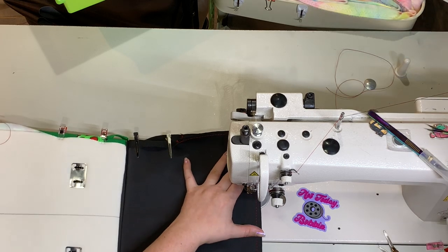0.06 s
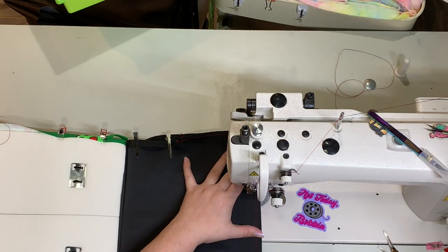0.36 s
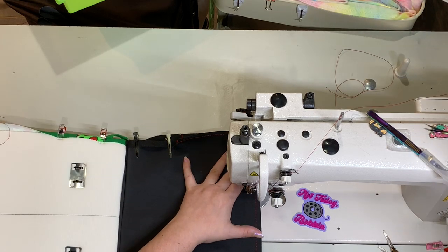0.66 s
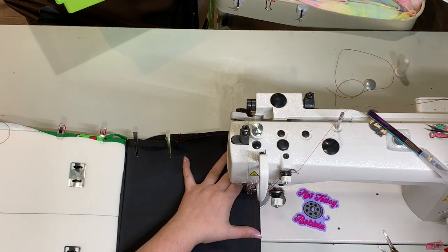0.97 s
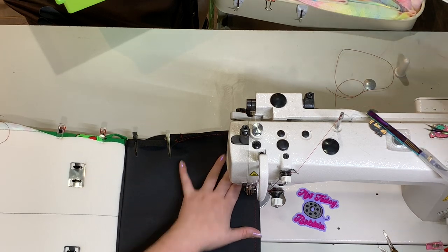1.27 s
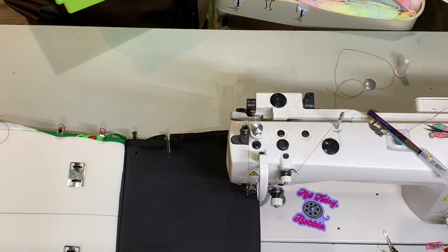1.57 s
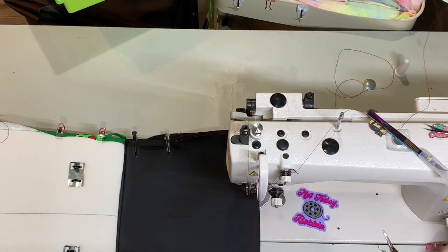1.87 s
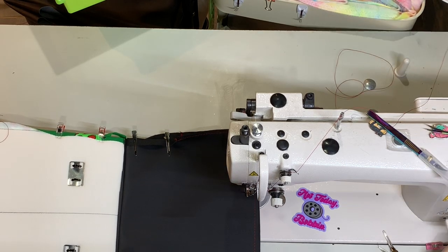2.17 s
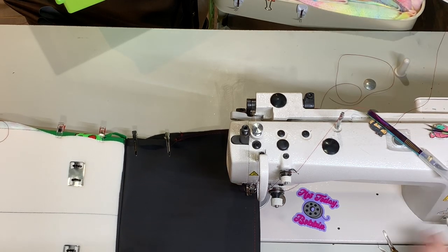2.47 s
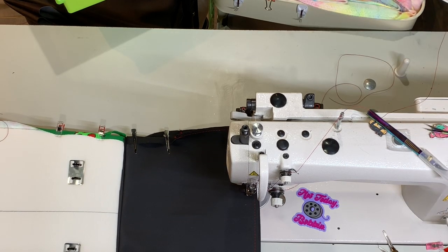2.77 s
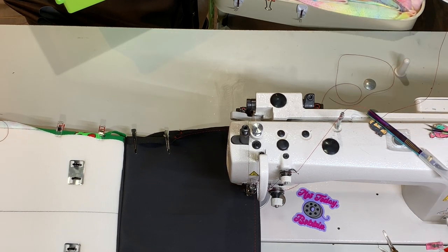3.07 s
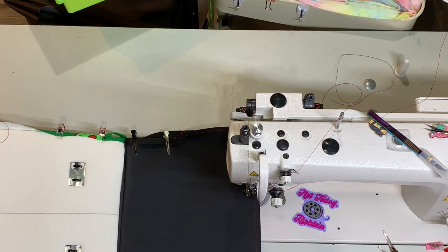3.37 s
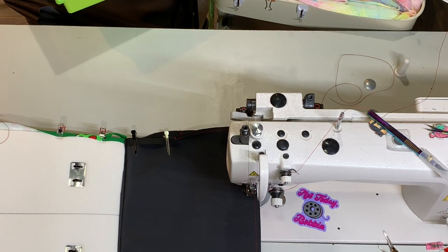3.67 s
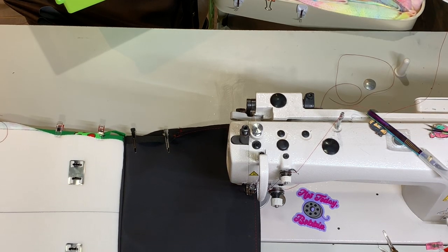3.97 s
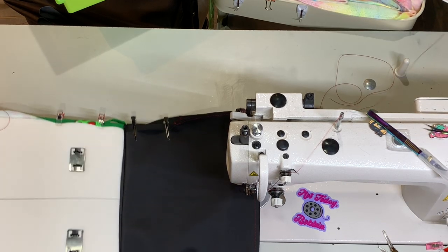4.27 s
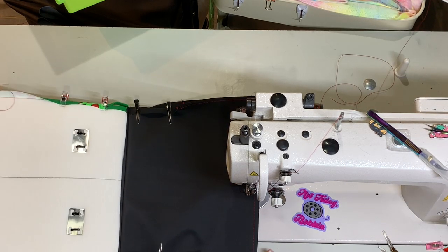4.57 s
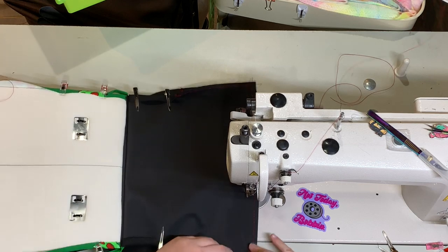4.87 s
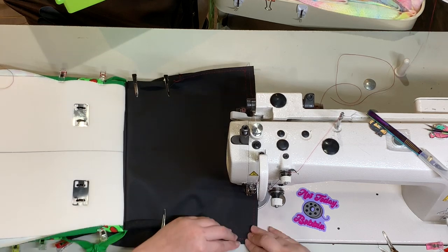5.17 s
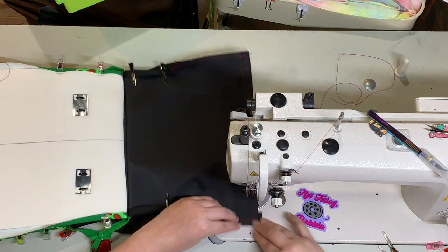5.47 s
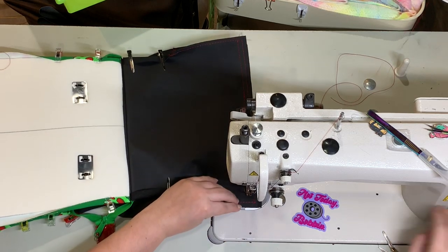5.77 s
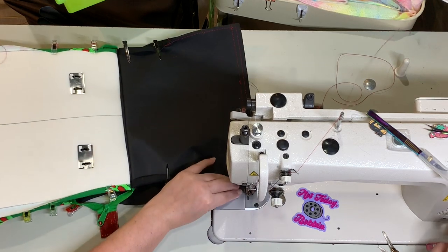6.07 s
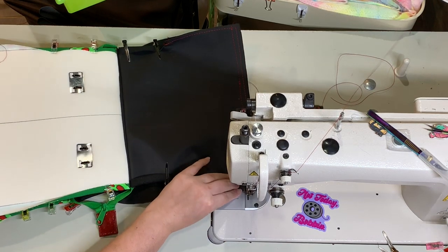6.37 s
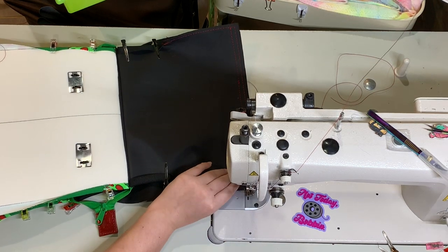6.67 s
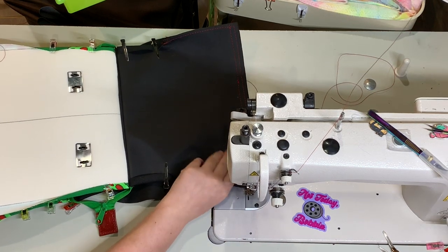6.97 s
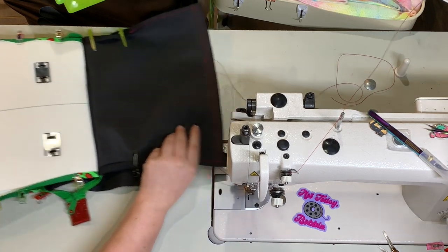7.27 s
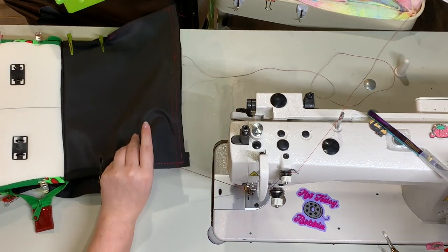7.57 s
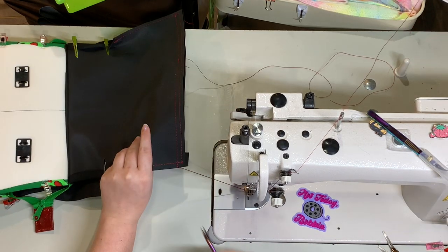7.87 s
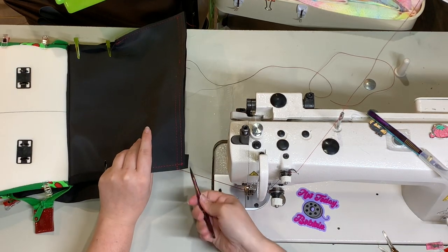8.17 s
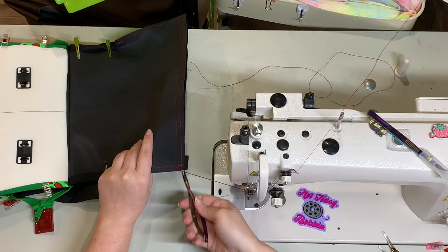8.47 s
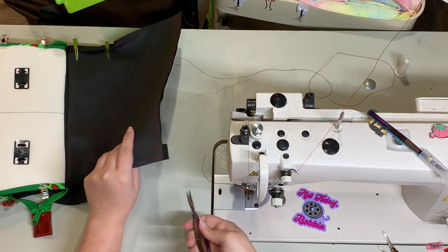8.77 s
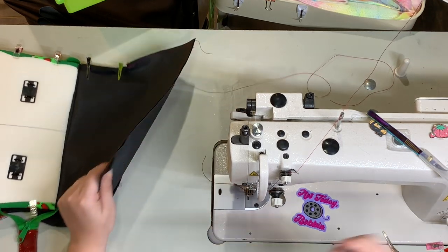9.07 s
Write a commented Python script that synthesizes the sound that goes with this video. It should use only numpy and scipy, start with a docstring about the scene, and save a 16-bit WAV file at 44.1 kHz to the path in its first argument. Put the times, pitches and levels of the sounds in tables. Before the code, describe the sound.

Heard from just above the table, light fabric rustles lead into a few slow stitches of an industrial sewing machine, with metallic clinks and knocks. After a short pause the machine speeds into a rapid two-second clatter with gear whine and a low table drone, then halts abruptly. Hands scuff and slide the cloth, and small thread snips click crisply. A low fan rumble fills the workroom throughout.

```python
"""A workroom with a low ventilation rumble, heard from above an industrial lockstitch machine on a table.
The machine makes a few slow stitches, then runs for two seconds at about 21 stitches a second and stops
sharply. Impacts of needle and linkages excite the modes of its head, the gears whine at multiples of the
shaft speed, and table and stand shake in forced vibration. Fingers scuff and slide the fabric, which
sounds by friction, and thread snips click."""
import sys
import numpy as np
from scipy import signal
from scipy.fft import rfft, irfft, next_fast_len
from scipy.io import wavfile
from scipy.ndimage import uniform_filter1d, map_coordinates

SR = 44100
rng = np.random.default_rng(int(sys.argv[2]) if len(sys.argv) > 2 else 0)


def put_to_file(sound):
    """Save the sound as 16-bit audio at rate SR, in the file named by the first command-line argument."""
    columns = np.atleast_2d(sound).T  # one column per channel
    safe = np.clip(columns, -1, 1)
    whole_steps = np.round(safe * 32767)
    wavfile.write(sys.argv[1], SR, whole_steps.astype(np.int16))


N = 411894

# Modes of the machine's head. Each row: frequency in Hz, relative level in dB, t60 in seconds.
HEAD_MODES = [(502, -13, 0.19), (1406, 3, 0.088), (1478, -14, 0.048), (1747, -23, 0.056),
              (1841, -4.5, 0.051), (2326, -6, 0.064), (2980, -4.5, 0.017), (3140, -16, 0.086),
              (3950, -14, 0.047), (4550, -16, 0.096), (6360, -10, 0.043), (8110, 2.5, 0.022)]
# Spectra of the machine's rattle as heard, with a narrow gap near 11.3 kHz, and of the ringing table.
# Each row: frequency in Hz, relative density in dB.
RATTLE_SPECTRUM = [(60, -15), (200, -6), (400, -6), (560, -4.5), (690, -7), (1150, -8.5), (1850, -9.5),
                   (2900, -9.5), (3500, -13), (4700, -12), (7000, -18), (8400, -15), (10200, -17.5),
                   (11300, -50), (13300, -10), (15000, -25), (16000, -42)]
DRONE_SPECTRUM = [(100, -21), (165, -13.5), (205, 9.5), (250, -7.5), (305, -6.5), (380, -13.5), (510, -8.5),
                  (750, -54)]
# Likeness of the two channels for rumbles and for near sources. Each row: frequency in Hz, coherence.
RUMBLE_COHERENCE = [(100, 0.92), (300, 0.88), (700, 0.065), (2000, 0.14), (8000, 0.11)]
NEAR_COHERENCE = [(150, 1), (500, 0.89), (1200, 0.61), (2500, 0.059), (5000, 0.037), (9000, 0.24),
                  (13500, 0.46)]


def amp(db):
    """Amplitude ratio of a level in decibels."""
    return 10 ** (np.asarray(db) / 20)


def unit(x):
    """Normalisation to an rms of 1."""
    return x / np.sqrt(np.mean(x ** 2) + 1e-20)


def along(points, hz):
    """Interpolation of (Hz, value) points on a logarithmic frequency axis."""
    freqs, values = np.transpose(points)
    return np.interp(np.log(hz + 1), np.log(freqs + 1), values)


def curve(points, outside):
    """Linear interpolation of (seconds, value) points at every sample."""
    return np.interp(np.arange(N) / SR, *np.transpose(points), outside, outside)


def wobble(rate):
    """Smooth random modulation: a spline through rate knots a second."""
    coarse = np.arange(0, N + 16, 16)
    knots = rng.standard_normal(int(N * rate / SR) + 4)
    return np.interp(np.arange(N), coarse, map_coordinates(knots, [coarse * rate / SR]))


def wander(rough, size):
    """Random walk in the phase of a ring whose contact chatters."""
    return rough * np.cumsum(rng.standard_normal(size)) / np.sqrt(SR)


def filtered(x, response):
    """Linear filtering: the spectrum of x times a frequency response."""
    n = x.shape[-1]
    padded = next_fast_len(n + 8192)
    return irfft(rfft(x, padded) * response(np.fft.rfftfreq(padded, 1 / SR)), padded)[..., :n]


def stereo(pair, spectrum, coherence):
    """Mid-side mixing turns two independent signals into a coloured, partly coherent pair of rms 1."""
    def response(hz):
        angle = np.arccos(np.clip(along(coherence, hz), -1, 1)) / 2
        return amp(along(spectrum, hz)) * [np.cos(angle), np.sin(angle)]
    mid, side = filtered(pair, response)
    return unit(np.array([mid + side, mid - side]))


def noise(spectrum, size, coherence=NEAR_COHERENCE):
    """Coloured Gaussian stereo noise of rms 1."""
    return stereo(rng.standard_normal((2, size)), spectrum, coherence)


def add(track, s, sound):
    """Superposition of a sound on the track, starting at s seconds."""
    part = track[:, max(0, round(s * SR)):][:, :sound.shape[1]]
    part += sound[:, :part.shape[1]]


def friction_gain(strokes, power):
    """Friction noise follows a power of the sliding speed, half a sine in each stroke."""
    t = np.arange(N) / SR
    return sum(amp(db) * np.abs(np.sin(np.pi * np.clip((t - s) / length, 0, 1))) ** power
               for s, length, db in strokes)


def ventilation(level_db, hum_db):
    """Fan noise: a low broadband rumble with faint discrete tones."""
    # Each row: frequency in Hz, relative density in dB.
    air_spectrum = [(13, -44), (22, -0.5), (54, -9.5), (81, 1.5), (108, -3.5), (197, -2.5), (257, -10),
                    (297, -10.5), (437, -19), (505, -19), (628, -26.5), (762, -25), (2250, -39),
                    (3310, -41.5), (7000, -58), (9100, -88), (15400, -120)]
    t = np.arange(N) / SR
    hum = sum(amp(2.7 * wobble(2.8)) * np.sin(2 * np.pi * hz * t + wobble(4.2))
              for hz in (37.7, 80.7, 150.7))
    rumble = amp(level_db + .7 * wobble(9)) * noise(air_spectrum, N, RUMBLE_COHERENCE)
    return rumble + amp(hum_db) * hum


def room(x):
    """Reverberation: wall reflections decay exponentially, each frequency at its own rate."""
    # Each row: frequency in Hz, t60 in seconds.
    decay_times = [(150, 0.29), (1500, 0.38), (6000, 0.39), (14000, 0.11)]
    hz, t, bands = signal.stft(rng.standard_normal((2, SR // 2)), SR, nperseg=256)
    tail = signal.istft(bands * amp(-60 * t / along(decay_times, hz)[:, None]), SR, nperseg=256)[1]
    tail = np.pad(tail / np.linalg.norm(tail[0]), ((0, 0), (SR // 200, 0)))
    high_passed = filtered(x, lambda f: f ** 2 / (f ** 2 + 400 ** 2))
    return signal.fftconvolve(high_passed, tail, axes=1)[:, :N]


def bumps(gain_db, t60):
    """Soft impacts of hand, fabric and needle bar on the table excite mainly low frequencies."""
    # Each row: start in seconds, relative level in dB.
    contacts = [(0.089, -35), (0.919, -42), (2.535, -21), (2.56, -26), (6.49, -30), (9.286, -30)]
    # Each row: frequency in Hz, relative density in dB.
    bump_spectrum = [(200, 0), (500, 4), (900, 6), (1600, -5), (4000, -37), (9000, -37)]
    out, t = np.zeros((2, N)), np.arange(SR // 5) / SR
    for s, db in contacts:
        add(out, s, noise(bump_spectrum, len(t)) * amp(db + gain_db - 60 * t / t60))
    return out


def fabric_scuffs(gain_db, slip_hz, slip_t60, attack_s, release_t60):
    """Stick-slip friction of the weave drives a resonance of the stiff fabric panel in short rasps."""
    # Each row: start in seconds, length in seconds, relative level in dB, resonance in Hz.
    rasps = [(1.063, 0.022, -50.5, 2000), (1.201, 0.037, -38.5, 1730), (1.242, 0.025, -39.5, 2080),
             (1.285, 0.023, -45, 1600), (1.4046, 0.026, -38, 1950), (1.461, 0.019, -41.5, 2400),
             (1.61, 0.018, -43, 2260), (6.812, 0.012, -38.5, 2900), (6.834, 0.03, -37.5, 1630),
             (6.922, 0.031, -38.5, 1650), (7.018, 0.019, -36, 1750), (7.088, .011, -36.5, 1750),
             (7.107, .011, -38, 1710), (7.138, 0.016, -35.5, 1630), (7.174, 0.013, -36.5, 1920),
             (7.248, 0.022, -42.5, 2190), (7.699, 0.033, -37.5, 1790), (7.811, 0.021, -41.5, 1680),
             (7.9748, 0.03, -36.5, 1710), (8.003, 0.024, -42.5, 1680), (8.185, .016, -47.5, 1610)]
    # Each row: frequency in Hz, relative density in dB.
    rasp_spectrum = [(400, -8.5), (900, -7.5), (1300, -0.5), (1750, -7), (2400, -3.5), (3200, -8),
                     (4300, -18), (9000, -41)]
    panel_db, half_width = 11, .06  # width as a share of the resonance frequency
    out, t = np.zeros((2, N)), np.arange(SR // 10) / SR
    for s, length, db, hz in rasps:
        slips = np.cumsum(np.r_[0, rng.uniform(.5, 1.5, size=64)]) / slip_hz
        since_slip = t - slips[np.searchsorted(slips, t, "right") - 1]
        grains = rng.standard_normal((2, len(t))) * amp(-60 * since_slip / slip_t60)
        panel = lambda f: np.sqrt(1 + amp(2 * panel_db) / (1 + ((f / hz - 1) / half_width) ** 2))
        rasp = unit(filtered(stereo(grains, rasp_spectrum, NEAR_COHERENCE), panel))
        envelope = (1 - np.exp(-t / attack_s)) * amp(-60 * np.maximum(t - length, 0) / release_t60)
        add(out, s, amp(db + gain_db) * envelope * rasp)
    return out


def fabric_slides(grain_db, rest_db):
    """Sliding friction between fabric and table gives a grainy hiss."""
    # Each row: start in seconds, length in seconds, level in dB.
    pushes = [(-.1, 0.26, -60), (.24, 0.21, -73.5), (.7, 0.19, -82), (1.24, 0.21, -54.5), (1.37, 0.22, -47),
              (1.59, 0.15, -51), (1.85, 0.13, -68), (1.98, 0.31, -59), (2.68, 0.2, -69), (2.9, .22, -64),
              (3.12, 0.2, -60.5), (3.47, 0.12, -67), (3.7, 0.21, -62), (6.52, 0.23, -54.5),
              (6.72, 0.59, -60), (7.08, 0.7, -53), (7.6, 0.2, -61), (8.92, 0.27, -55), (9.14, 0.32, -56.5)]
    # The hiss as heard, with a gap near 11.3 kHz. Each row: frequency in Hz, relative density in dB.
    hiss_spectrum = [(500, 6), (2000, 3.5), (4500, -0.5), (7000, -5.5), (9000, 3.5), (11300, -19.5),
                     (13800, 1), (15800, -17)]
    envelope = friction_gain(pushes, power=0.9) + amp(rest_db)
    return envelope * noise(hiss_spectrum, N) * amp(grain_db * wobble(500))


def snips(tick_db, tick_t60, shimmer_db, shimmer_t60, knock_db, knock_t60):
    """Hard impacts of blades, clips and levers reach high frequencies; some carry a duller knock."""
    # Each row: start in seconds, relative level in dB, relative level of the knock in dB.
    closings = [(1.984, -34.5, -5.5), (2.279, -33, -23), (2.443, -23, -22), (3.55, -43, -5.5),
                (3.706, -33, -12.5), (7.392, -30, -19), (7.522, -22, -37), (8.107, -45, 2),
                (8.2302, -21, -23), (8.6085, -44, 14), (8.6125, -46.5, 9), (8.9116, -22, -20),
                (9.092, -21.5, -34)]
    # The clicks as heard, with a gap near 11.5 kHz, and the knock.
    # Each row: frequency in Hz, relative density in dB.
    click_spectrum = [(1500, -31), (5000, -15.5), (7500, -14), (9500, 3.5), (11500, -19), (13000, 7.5),
                      (14800, -3), (16500, -23)]
    knock_spectrum = [(150, -31), (450, 1), (750, 4), (1500, -5), (2400, -3.5), (3700, -7), (4900, -11.5),
                      (15000, -24)]
    out, t = np.zeros((2, N)), np.arange(SR // 8) / SR
    for s, db, own_knock_db in closings:
        envelope = amp(tick_db - 60 * t / tick_t60) + amp(shimmer_db - 60 * t / shimmer_t60)
        tick = noise(click_spectrum, len(t)) * envelope
        knock = noise(knock_spectrum, len(t)) * amp(knock_db + own_knock_db - 60 * t / knock_t60)
        add(out, s, amp(db) * (tick + knock))
    return out


def squeak(rough):
    """Stick-slip oscillation of a dry joint makes a short, falling chirp."""
    # In order: start in seconds, length in seconds, level in dB, first and last pitch in Hz.
    chirp = (2.468, .042, -36, 3300, 3080)
    s, length, db, first_hz, last_hz = chirp
    hz = curve([(s, first_hz), (s + length, last_hz)], first_hz)
    phase = 2 * np.pi * np.cumsum(hz) / SR + rough * wobble(400)
    return friction_gain([(s, length, db)], power=0.71) * np.sin(phase)


def clinks(attack_s, rough):
    """Damped free vibration of loose steel parts, each at its own unsteady pitch."""
    # Each row: start in seconds, level in dB, frequency in Hz, t60 in seconds.
    loose_parts = [(2.257, -26.5, 2080, 0.028), (2.282, -31.5, 3030, 0.16), (2.412, -25, 2220, .04),
                   (2.428, -23.5, 1320, 0.03), (2.469, -36, 3150, 0.024), (2.535, -24, 1420, 0.055),
                   (2.646, -24.5, 2340, 0.035), (2.66, -21, 1480, 0.036), (6.398, -24, 1450, 0.045),
                   (6.411, -29, 1480, 0.07)]
    out, t = np.zeros((2, N)), np.arange(SR // 5) / SR
    for s, db, hz, t60 in loose_parts:
        drift = wander(rough, len(t)) + rng.normal(0, 0.44, (2, 1))
        envelope = amp(db - 60 * t / t60) * (1 - np.exp(-t / attack_s))
        add(out, s, envelope * np.sin(2 * np.pi * hz * t + drift))
    return out


def head_ring(t):
    """Modal response of the struck head: damped sines of random strength, with random phase offsets between
    left and right that grow with pitch."""
    ring = 0
    for hz, db, t60 in HEAD_MODES:
        envelope = amp(db + rng.normal(0, 3.0) - 60 * t / t60)
        drift = wander(10, len(t)) + rng.normal(0, 0.45, (2, 1)) * hz / 1500
        ring += envelope * np.sin(2 * np.pi * hz * t + drift)
    return ring


def through_head(x, peak_db, width=0.013):
    """Resonance lifts whatever sounds inside the head at the head's modes."""
    def response(f):
        peaks = sum(amp(2 * peak_db + db) / (1 + ((f - hz) / (width * hz)) ** 2)
                    for hz, db, _ in HEAD_MODES)
        return np.sqrt(1 + peaks)
    return filtered(x, response)


def clacks(ring_db, crack_db, crack_t60, buzz_db, buzz_t60):
    """Impact excitation: levers and needle bar hit their stops with a crack, and the head rings."""
    # Each row: start in seconds, relative level in dB, relative level of the ring in dB.
    impacts = [(2.083, -32.5, -10), (2.2222, -26, -19), (2.2584, -27, -24), (2.285, -20.5, -6),
               (2.3, -34, -11), (2.38, -32, -3), (2.413, -23.5, -13), (2.442, -24, -22), (2.4694, -18, -25),
               (2.534, -11.5, -13), (2.558, -20, -11), (2.623, -28, 0), (2.6477, -16.5, -19),
               (2.661, -29, -1), (2.795, -33.5, -40), (2.813, -34, -30), (3.91, -30.5, -34),
               (3.986, -24.5, -8.5), (4.022, -14.5, -3.5), (4.098, -21.5, -23), (4.119, -17.5, -24),
               (6.204, -20.5, -14), (6.234, -19, -16), (6.267, -10.5, -31), (6.29, -17.5, -10.5),
               (6.321, -39, -12), (6.361, -35, -3), (6.4, -31, -10), (6.585, -30.5, -22)]
    out, t = np.zeros((2, N)), np.arange(SR // 5) / SR
    for s, db, own_ring_db in impacts:
        envelope = amp(crack_db - 60 * t / crack_t60) + amp(buzz_db - 60 * t / buzz_t60)
        crack = through_head(noise(RATTLE_SPECTRUM, len(t)), peak_db=8.0) * envelope
        ring = amp(ring_db + own_ring_db) * head_ring(t) * (1 - np.exp(-t / 0.0026))
        add(out, s, amp(db) * (crack + ring))
    return out


def shaft(speed_rows, stitch_s):
    """Shaft speed and its integral, the angle in turns, which is zero at stitch_s."""
    speed = curve(speed_rows, 0)
    turns = np.cumsum(speed) / SR
    return speed, turns - np.interp(stitch_s * SR, np.arange(N), turns)


def rattle(turns, spread_db, hiss_db, smear_t60, locked_share, count=40):
    """Periodically modulated noise: small contacts recur each turn over the hiss of hook and thread."""
    # Load on the linkages. Each row: share of a turn, gain in dB.
    load_cycle = [(.02, -0.5), (.1, -1), (.2, -1), (.36, -0.5), (.6, -4.5), (.73, -1.5), (.88, -1.5)]
    places = (np.arange(count) + rng.random(count)) / count
    sizes_db = rng.uniform(-1.1, 1, count) * spread_db
    angles = np.arange(np.ceil(turns[0]) - 1, turns[-1])[:, None] + places
    samples = np.interp(angles, turns, np.arange(N)).astype(int)
    in_run = (angles > turns[0]) & (angles < turns[-1])
    energies = amp(sizes_db + rng.normal(0, 5.6, angles.shape)) ** 2 * in_run
    impulses = np.bincount(samples.ravel(), energies.ravel(), N)
    # the covers smear the energy of every contact over a few milliseconds
    t = np.arange(SR // 25) / SR
    power = abs(signal.fftconvolve(impulses, amp(-60 * t / smear_t60) ** 2)[:N])
    step = np.gradient(turns)
    power /= power[step > 0].mean()
    envelope = np.sqrt((power + amp(hiss_db) ** 2) / (1 + amp(hiss_db) ** 2))
    # part of the friction repeats with the surface of the gears, turn after turn
    surface = rng.standard_normal((2, 2048))
    locked = surface[:, (turns % 1 * 2048).astype(int) % 2048] * (step > 0)
    share = locked_share * step / step.max()
    friction = np.sqrt(share) * locked + np.sqrt(1 - share) * rng.standard_normal((2, N))
    load = amp(np.interp(turns, *np.transpose(load_cycle), period=1))
    return stereo(friction, RATTLE_SPECTRUM, NEAR_COHERENCE) * envelope * load


def slow_stitches(rub_db, drone_db):
    """At a crawl, friction in the linkages sounds in strokes and the table drones with the speed."""
    # Each row: time in seconds, shaft speed in turns a second.
    crawl_speed = [(2.1, 3), (2.3, 6.4), (2.45, 8.5), (2.65, 8.5), (2.8, 2.4)]
    # Each row: start in seconds, length in seconds, relative level in dB.
    strokes = [(2.215, 0.11, -39), (2.405, 0.19, -44.5), (2.63, 0.08, -51.5)]
    speed, turns = shaft(crawl_speed, stitch_s=2.534)
    pace = speed / speed.max()
    contacts = rattle(turns, spread_db=-1.0, hiss_db=-2.0, smear_t60=0.043, locked_share=0.13)
    envelope = friction_gain(strokes, power=0.52) + amp(rub_db) * pace ** 4
    drone = amp(drone_db) * pace * noise(DRONE_SPECTRUM, N, RUMBLE_COHERENCE)
    return envelope * through_head(contacts, peak_db=5.5) + drone


def stand_sway(turns):
    """Beating: the stand rocks in two low tones tied to the shaft, over a rumble."""
    # Each row: time in seconds, relative level in dB.
    sway_levels = [(4.1, -42.5), (4.3, -35), (4.52, -31.5), (4.65, -36), (4.82, -30), (5.1, -33),
                   (5.4, -33), (5.55, -29.5), (5.8, -26), (6.05, -27), (6.23, -30), (6.4, -53)]
    # Each row: multiple of the shaft speed, relative level in dB.
    rocking_orders = [(3, -3.5), (3.5, -4.5)]
    # Each row: frequency in Hz, relative density in dB.
    stand_spectrum = [(40, -27), (56, -4), (66, -4), (76, 3.5), (90, -6), (120, -10), (200, -69)]
    rocking = sum(amp(db + 2.3 * wobble(5))
                  * np.cos(2 * np.pi * order * (turns - 1.3) + 0.27 * wobble(5.5))
                  for order, db in rocking_orders)
    rumble = amp(-2.0) * noise(stand_spectrum, N, RUMBLE_COHERENCE)
    return amp(curve(sway_levels, -120) - 3.0) * (rocking + rumble)


def table_shake(speed, turns):
    """Forced vibration: needle bar and feed drive the table at shaft harmonics, one thud a stitch."""
    # Each row: frequency in Hz, response in dB.
    table_response = [(40, -25), (105, -40), (128, -3.5), (152, -33), (166, -7.5), (174, 0), (190, -7),
                      (198, -7.5), (208, 3), (218, -0.5), (229, -1), (240, -12), (264, -15.5), (298, -7.5),
                      (326, -34), (352, -12.5), (400, -17.5)]
    dispersion = 0.1194  # radians per squared order: higher orders arrive first
    shake = 0
    for order in range(2, 19):
        phase = 2 * np.pi * order * (turns + 0.1015) + dispersion * (order - 10) ** 2
        shake += amp(along(table_response, order * speed) + wobble(5.9)) * np.cos(phase + 0.2 * wobble(13))
    return shake


def table_drone():
    """Free vibration of the table, strongest near the start and end of the run."""
    # Each row: time in seconds, level in dB.
    drone_levels = [(3.93, -58), (3.99, -31), (4.15, -32.5), (4.24, -26), (4.36, -33.5), (5.7, -38),
                    (6.0, -32.5), (6.16, -27.5), (6.28, -30), (6.38, -38.5), (6.5, -38)]
    return amp(curve(drone_levels, -120)) * noise(DRONE_SPECTRUM, N, RUMBLE_COHERENCE)


def motor_whine(turns, order, flutter):
    """Random phase modulation blurs the motor's tone, a high harmonic of the shaft speed."""
    # Each row: time in seconds, level in dB.
    whine_levels = [(4.25, -62), (4.4, -46), (5.05, -40), (5.45, -58), (5.9, -58), (6.05, -40), (6.3, -54)]
    envelope = amp(curve(whine_levels, -120) + 3.9 * wobble(24.8))
    drift = flutter * wobble(90) + 0.36 * np.array([wobble(60), wobble(60)])
    return envelope * np.sin(2 * np.pi * order * turns + drift)


def gear_whine(turns):
    """Meshing tones of belt and hook gears; backlash makes the higher ones flutter more."""
    # Each row: multiple of the shaft speed, relative level in dB.
    mesh_orders = [(24, -18), (26, -15), (27, -21), (78, -21), (85, -24.5), (88, -19.5)]
    return sum(amp(db + 6.0 + 3.8 * wobble(14))
               * np.sin(2 * np.pi * order * turns + 0.14 * np.sqrt(order) * wobble(70))
               for order, db in mesh_orders)


def ticks(pace, turns, speed_power):
    """Periodic impacts: feed, needle bar, hook and take-up lever meet their stops in every turn."""
    # Each row: share of a turn, level at top speed in dB, centre in Hz, width in Hz, t60 in seconds.
    stops = [(-.31, -32.5, 3000, 2000, 0.026), (-.025, -40, 4000, 4500, .025),
             (-.025, -36, 9100, 1100, 0.027), (-.025, -28, 13800, 1600, .02), (.14, -31, 8900, 800, 0.027),
             (.145, -38, 14200, 700, 0.02), (.2, -28.5, 2450, 710, 0.026), (.21, -44, 4300, 1460, 0.023),
             (.43, -38, 13200, 600, 0.029), (-.025, -35.5, 525, 129, 0.071), (.2, -29.5, 550, 150, 0.043)]
    out, t = np.zeros((2, N)), np.arange(SR // 25) / SR
    whole_turns = np.arange(np.ceil(turns[0]) + 1, turns[-1] - 1)
    for share, db, hz, width_hz, t60 in stops:
        band_pass = lambda f: 1 / (1 + (2 * (f - hz) / width_hz) ** 4)
        band = unit(filtered(noise(RATTLE_SPECTRUM, len(t) * len(whole_turns)), band_pass))
        bursts = np.split(band, len(whole_turns), axis=1)
        for at, burst in zip(np.searchsorted(turns, whole_turns + share), bursts):
            add(out, at / SR, burst * amp(db - 60 * t / t60) * pace[at] ** speed_power)
    return out


def needle_blows(turns, lead_turns, ping_rise_s, rebound_s, clack_db, clack_t60):
    """Impact and rebound: the needle pings through the fabric, its bar clacks twice, the head rings."""
    # Along the seam. Each row: time in seconds, level in dB, ping in Hz, relative ring level in dB.
    seam = [(4.03, -32, 1420, -4), (4.13, -24.5, 1505, 1), (4.23, -20, 1487, -2), (4.38, -21, 1493, -5),
            (4.53, -16.5, 1465, -8), (4.58, -25.5, 1540, 0.5), (4.81, -18, 1410, 1), (4.86, -27, 1410, -7),
            (4.9, -21, 1726, -13), (5.14, -23.5, 1665, -4), (5.55, -21, 1653, -15), (5.6, -21, 1440, -15),
            (5.78, -32, 1430, -2), (5.87, -26.5, 1445, -3), (6.12, -25, 1375, 6), (6.17, -19, 1340, -6)]
    # Each row: frequency in Hz, relative density in dB.
    bar_spectrum = [(700, -17), (1300, 1.5), (1800, 7), (2900, -8), (3600, -13.5), (7000, -46)]
    out, t = np.zeros((2, N)), np.arange(SR // 8) / SR
    seam_s, force_db, ping_hz, ring_db = np.transpose(seam)
    swell = (t / ping_rise_s * np.exp(1 - t / ping_rise_s)) ** 2
    for turn in np.arange(np.ceil(turns[0]), turns[-1]):
        s = np.searchsorted(turns, turn - lead_turns) / SR
        if s < seam_s[-1] + .02:
            hz = np.interp(s, seam_s, ping_hz) * np.exp(.02 * rng.normal())
            drift = wander(20, len(t)) + rng.normal(0, 0.34, (2, 1))
            ping = swell * np.sin(2 * np.pi * hz * t + drift)
            ring = amp(np.interp(s, seam_s, ring_db)) * head_ring(t) * (1 - np.exp(-t / 0.005))
            force = amp(np.interp(s, seam_s, force_db) + rng.normal(-1.3, 0.83))
            add(out, s, force * (ping + ring))
            for delay in (0, rebound_s * rng.uniform(.85, 1.15)):
                clack = noise(bar_spectrum, len(t)) * amp(clack_db - 60 * t / clack_t60)
                add(out, s + delay, force * clack)
    return out


def fast_run(head_db, shake_db):
    """Rotating machinery: the shaft times each part; rattle and shake grow as powers of its speed."""
    # Each row: time in seconds, shaft speed in turns a second.
    run_speed = [(3.96, 0), (3.99, 5.5), (4.08, 10.35), (4.22, 19.52), (4.35, 20.73), (4.6, 20.86),
                 (4.75, 20.92), (4.92, 22.1), (5.2, 21.71), (5.5, 21.68), (5.75, 21.54), (6.0, 20.82),
                 (6.18, 19.78), (6.35, 14), (6.53, 1)]
    speed, turns = shaft(run_speed, stitch_s=4.997)
    pace = speed / speed.max()
    # the parts are loaded while the motor pulls them up to speed, and run light while it brakes
    full_pull = 47  # turns a second per second
    pull = np.tanh(uniform_filter1d(np.gradient(speed) * SR, size=SR // 20) / full_pull)
    contacts = rattle(turns, spread_db=0.5, hiss_db=-0.5, smear_t60=0.059, locked_share=0.4)
    clatter = amp(4.0) * through_head(contacts, peak_db=4.0)
    whine = through_head(gear_whine(turns), peak_db=12.0, width=0.0093) * pace ** 2
    head = amp(head_db + 2 * pull) * pace ** 1.63 * (clatter + whine)
    blows = needle_blows(turns, lead_turns=0.04016, ping_rise_s=0.0036, rebound_s=.007,
                         clack_db=-3.5, clack_t60=0.027)
    blows += ticks(pace, turns, speed_power=2.3)
    table = amp(shake_db + 2.5 * pull) * pace ** 2 * table_shake(speed, turns) + table_drone()
    return head + blows + table + stand_sway(turns) + motor_whine(turns, order=221, flutter=3.1)


def scene():
    """Superposition of the direct sound of machine and hands, their reverberation and the ventilation."""
    machine = fast_run(head_db=-30.5, shake_db=-28) + slow_stitches(rub_db=-41, drone_db=-37.5)
    machine += clacks(ring_db=-3, crack_db=-13, crack_t60=.045, buzz_db=-21, buzz_t60=0.13)
    machine += clinks(attack_s=0.0013, rough=22) + squeak(rough=1.3)
    hands = snips(tick_db=-8.5, tick_t60=0.014, shimmer_db=-19.0, shimmer_t60=0.036,
                  knock_db=1.5, knock_t60=.026)
    hands += bumps(gain_db=-10.5, t60=0.072)
    hands += fabric_scuffs(gain_db=-2.5, slip_hz=420, slip_t60=0.0093, attack_s=0.00082, release_t60=.04)
    hands += fabric_slides(grain_db=2.0, rest_db=-74.5)
    reverberation = amp(-7.0) * room(machine) + amp(-4.0) * room(hands)
    return machine + hands + reverberation + ventilation(level_db=-38.5, hum_db=-55.0)


def record(dry):
    """Frequency response: the two microphone ports differ in colour and share a band limit."""
    # Each row: frequency in Hz, left minus right level in dB.
    balance = [(120, -1.9), (600, 0.5), (1400, 2), (2800, 2), (5500, 0), (9000, -2), (13500, 0.5)]
    top_hz = 16200
    return filtered(dry, lambda hz: amp(np.outer([.5, -.5], along(balance, hz))) * (hz < top_hz))


dry = scene()
out = record(dry)
put_to_file(out)
```